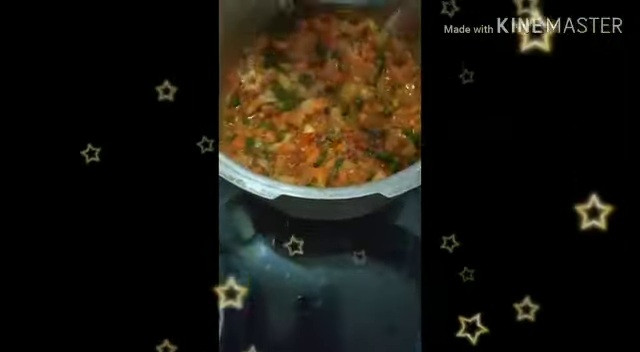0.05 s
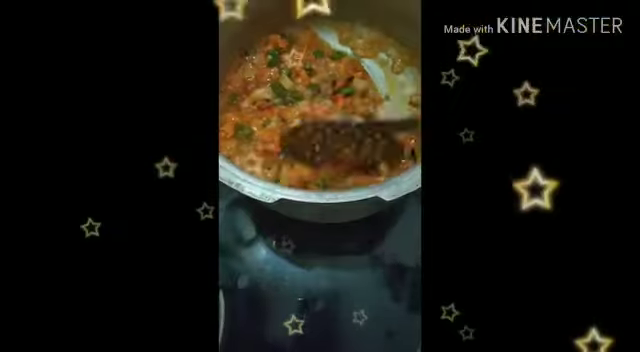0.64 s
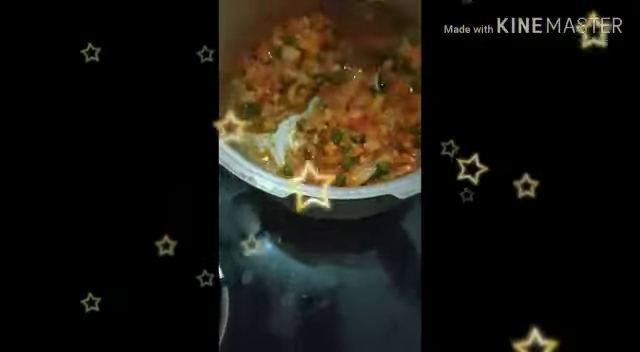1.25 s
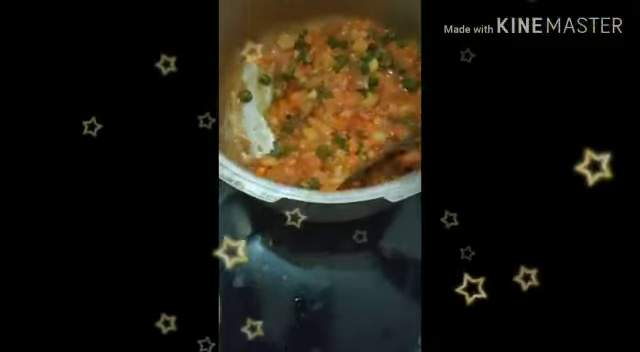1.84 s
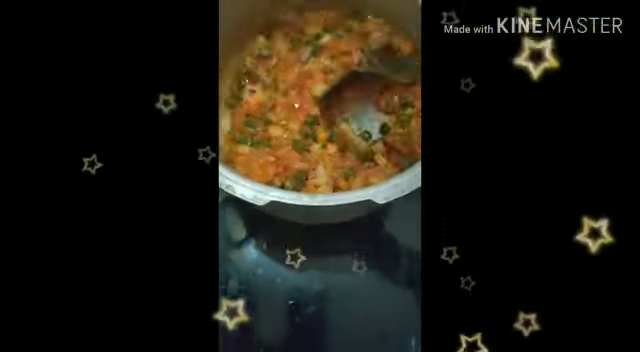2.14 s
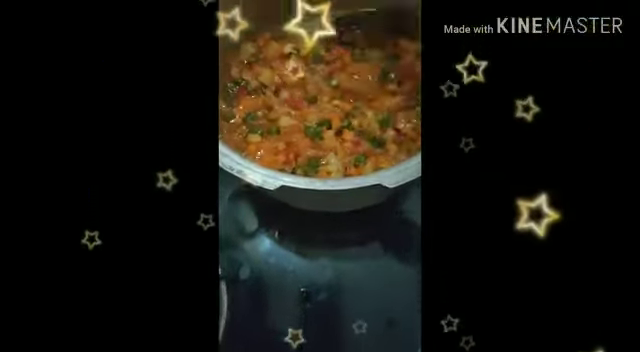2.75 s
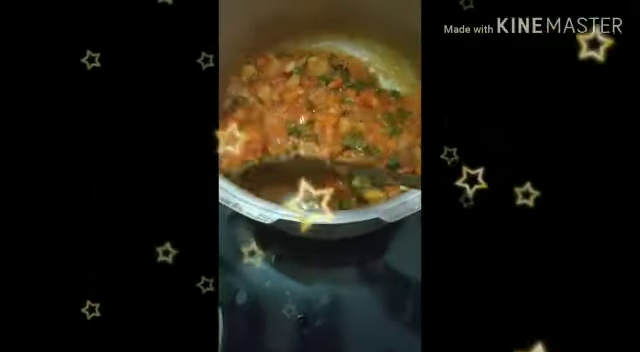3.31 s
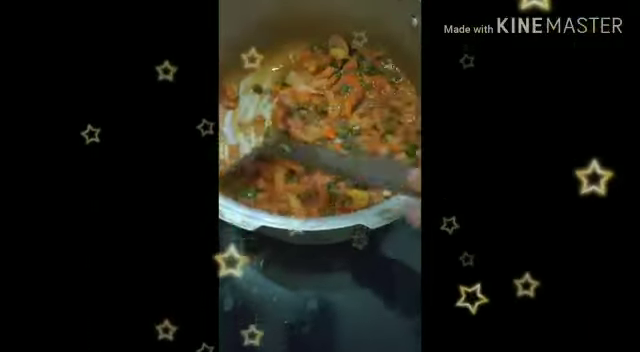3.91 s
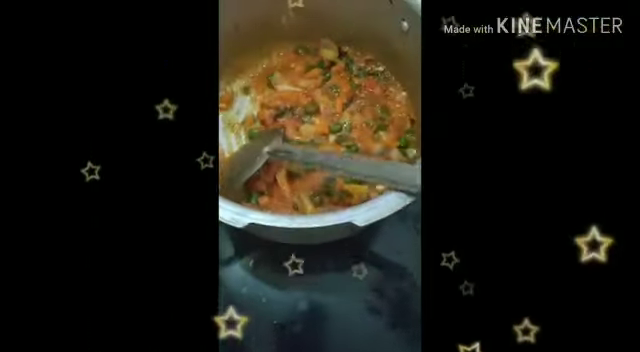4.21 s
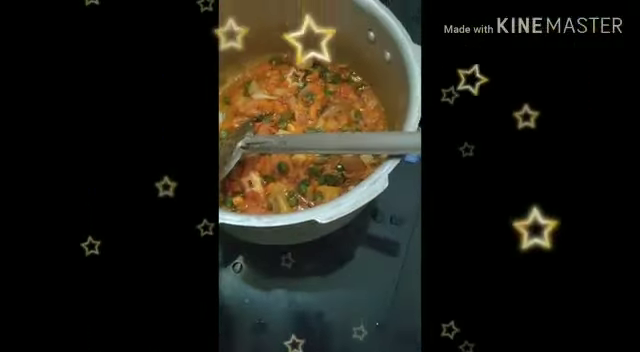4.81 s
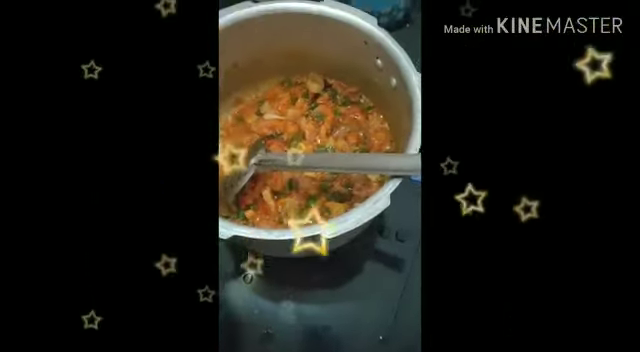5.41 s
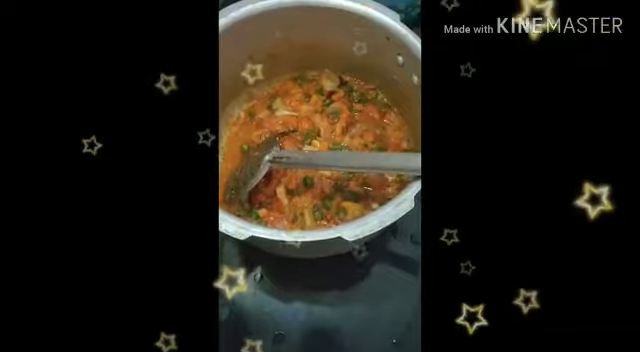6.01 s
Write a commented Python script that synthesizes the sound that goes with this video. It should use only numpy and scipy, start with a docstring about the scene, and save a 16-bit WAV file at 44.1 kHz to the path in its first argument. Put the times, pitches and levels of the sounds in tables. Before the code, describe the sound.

Close up in a small kitchen, a metal ladle churns moist vegetables in an aluminium pot, with uneven scrapes, short damped clanks and soft flops of food over a quiet sizzle. The pot rocks under the shoves, and the loudest knock comes with a low thud. Then the stirring stops, leaving the thick sauce to fry, plop and spit, with little hisses of steam near the end.

```python
"""Thick vegetables sizzle close by in a small kitchen, and a steel ladle starts stirring them at once.
It knocks on the aluminium pressure cooker, sticks and slips over the bottom and churns the wet food.
Shoves rock the pot; one hard blow jolts it on the stove. Then the ladle rests and the frying swells:
bursting bubbles ring the air in the pot, fat spits and steam spurts through the sauce."""
import sys
import numpy as np
from scipy import signal
from scipy.fft import rfft, irfft
from scipy.io import wavfile
from scipy.ndimage import uniform_filter1d

SR = 44100
rng = np.random.default_rng(int(sys.argv[2]) if len(sys.argv) > 2 else 0)


def wav_record(signal):
    """Record a signal, one row per channel, as 16-bit PCM in the file named by sys.argv[1]."""
    frames = np.transpose(np.atleast_2d(signal))
    bounded = np.clip(frames, -1, 1)
    # unit amplitude maps onto the largest positive 16-bit level
    quanta = np.round(bounded * 32767).astype(np.int16)
    wavfile.write(sys.argv[1], SR, quanta)


N = 267241
T = np.arange(N) / SR


def undb(db):
    """Decibels to gain."""
    return 10 ** (np.asarray(db) / 20)


def unit(x):
    """Scale to rms 1."""
    return x / np.sqrt(np.mean(x ** 2))


def colour(x, points):
    """Causal filter through (Hz, dB) points, built from the cepstrum."""
    size = 2048
    hz, db = np.transpose(points)
    bins_hz = np.maximum(np.arange(size // 2 + 1) * SR / size, 1)
    gain = undb(np.interp(np.log(bins_hz), np.log(hz), db))
    cepstrum = irfft(np.log(gain))
    cepstrum[1:size // 2] *= 2
    cepstrum[size // 2 + 1:] = 0
    return signal.fftconvolve(x, irfft(np.exp(rfft(cepstrum))))[:len(x)]


def resonate(x, hz, width_hz):
    """Two equal resonators in series, each width_hz wide; gain 1 at the centre."""
    b, a = signal.iirpeak(hz, hz / width_hz, fs=SR)
    return signal.lfilter(b, a, signal.lfilter(b, a, x))


def walk(rate_hz):
    """Smooth random drift, rms 1."""
    hold = int(SR / rate_hz)
    steps = np.repeat(rng.standard_normal(N // hold + 1), hold)
    return unit(uniform_filter1d(uniform_filter1d(steps, hold), hold)[:N])


def grains(per_s, spread_db):
    """Clicks of random time and size, rms 1."""
    sizes = undb(spread_db * np.clip(rng.standard_normal(N), -2, 2)) * rng.choice([-1, 1], N)
    return unit(sizes * (rng.random(N) < per_s / SR))


def fade(t, t60):
    """Exponential decay, 60 dB down at t60."""
    return np.exp(-np.log(1000) * t / t60)


def swell(peak_s, rise_s, fall_s, rounding=0.067):
    """Rises 20 dB per rise_s to a rounded top of gain 1, then falls 20 dB per fall_s."""
    away = np.maximum((peak_s - T) / rise_s, (T - peak_s) / fall_s)
    return undb(-20 * (np.hypot(away, rounding) - rounding))


def surges(table):
    """Joint gain of symmetric swells, summed in power."""
    return np.sqrt(sum((undb(db) * swell(s, slope_s, slope_s)) ** 2 for s, slope_s, db, *_ in table))


def pot_air(modes, swing_db):
    """Bursting bubbles excite the air in the pot; each mode wavers as the bursts move about."""
    air = 0
    for hz, width_hz, db in modes:
        bubbles = grains(per_s=260, spread_db=4.5) * undb(swing_db * walk(10))
        air = air + undb(db) * resonate(bubbles, hz, 2 * width_hz)
    return unit(air)


# Frying contour. Each row: time in seconds, level in dB.
FRYING_LEVEL = [(0, -53.5), (.7, -53), (1.95, -60.5), (2.55, -52.5), (3.55, -53.5), (4.6, -61.5), (5, -57),
                (5.27, -53), (5.47, -56), (6.05, -52)]
# Air modes of the pot, low and high. Each row: frequency in Hz, width in Hz, level in dB.
LOW_AIR_MODES = [(140, 70, -5), (635, 65, 4.5), (1280, 75, 2)]
HIGH_AIR_MODES = [(2190, 237, -7), (2643, 170, -4), (3250, 460, -9), (13020, 1300, -21)]


def frying(bubbling_db=-8.5, sizzle_db=-2.5):
    """Thick sauce bubbles and sizzles on hot metal. Returns the sound and its gain contour."""
    contour = undb(np.interp(T, *np.transpose(FRYING_LEVEL)))
    bubbling = pot_air(LOW_AIR_MODES, swing_db=3.6)
    sizzle = pot_air(HIGH_AIR_MODES, swing_db=2.8) * undb(1.5 * walk(25))
    return contour * (undb(bubbling_db) * bubbling + undb(sizzle_db) * sizzle), contour


# Spectrum of spitting fat. Each row: frequency in Hz, level in dB.
SPIT_SPECTRUM = [(1000, -18), (2200, 1), (4200, 0), (5200, 0), (6600, 1), (8500, -7), (10500, -9),
                 (13000, -12), (15500, -12)]
# Flares. Each row: peak in seconds, rise and fall in seconds, level in dB, steam pitch in Hz.
FLARE_UPS = [(1.27, .15, -61, 8600), (2.5, .2, -57, 6800), (4.78, .1, -65, 5000), (5.27, .2, -61, 4700),
             (5.54, .12, -54, 6400), (5.68, .1, -50, 2300), (5.705, .11, -45.5, 6900),
             (5.97, .2, -53.5, 5900)]


def fat_and_steam(frying_gain, steady_db=-21, flare_db=-4):
    """Fat spits throughout; at each flare it spits harder and steam jets through a hole in the sauce."""
    fat = colour(grains(per_s=550, spread_db=7.5), SPIT_SPECTRUM) * undb(2.8 * walk(30))
    fat_gain = np.hypot(undb(flare_db) * surges(FLARE_UPS), undb(steady_db) * frying_gain)
    fizz = grains(per_s=800, spread_db=6)
    steam = sum(undb(db) * swell(s, slope_s, slope_s) * unit(resonate(fizz, hz, width_hz=1100))
                for s, slope_s, db, hz in FLARE_UPS)
    return fat_gain * unit(fat) + steam


def hush(level_db=-81):
    """Faint, steady low noise."""
    noise = colour(rng.standard_normal(N), [(25, -8), (150, -7), (400, -18.5), (900, -48.5)])
    return undb(level_db) * unit(noise)


# Modes of the food-damped pot and ladle. Each row: frequency in Hz, t60 in seconds, level in dB.
METAL_MODES = [(338, .14, -22), (640, .12, -14), (1182, .08, -14), (1243, .09, -10.5), (1845, .1, -9),
               (2331, .08, -9), (5254, .1, -15), (6260, .2, -7), (6497, .2, -7), (6761, .2, -8),
               (7063, .2, -7), (7520, .2, -9)]


def ring(t, scatter_db, detune):
    """The metal rings; each contact point weights and shifts its modes differently."""
    hz, t60_s, db = np.transpose(METAL_MODES)[:, :, None]
    size, shift, phase = rng.standard_normal((3, len(METAL_MODES), 1))
    waves = np.sin(2 * np.pi * hz * (1 + detune * shift) * t + np.pi * phase)
    return np.sum(undb(db + scatter_db * size) * fade(t, t60_s) * waves, axis=0)


def attack_db(blow, band_hz):
    """Level of one band in the first 12 ms of a blow."""
    bandpass = signal.butter(3, band_hz, 'band', fs=SR, output='sos')
    return 10 * np.log10(np.mean(signal.sosfilt(bandpass, blow[:int(.012 * SR)]) ** 2))


# Dense overtones of the metal. Each row: frequency in Hz, level in dB.
METAL_SPECTRUM = [(60, -19.5), (170, 2), (430, -12), (640, -1), (900, -12.5), (1250, -0.5), (1600, 5.5),
                  (1900, 12.5), (2400, 20.5), (3400, 16.5), (4150, 4), (4900, 10), (6800, 8.5),
                  (8300, -3.5), (9600, -17.5), (15000, -23.5)]
# Ladle blows. Each row: start in seconds, note of the struck spot in Hz, strength in dB, bottom ring
# in dB, contact hardness in dB, thud through the food in dB, blade chatter t60 in seconds.
BLOWS = [(0.111, 2410, -45, -30, -33, -16, 0.038), (0.79, 1275, -39.5, 9.5, 10, 1, 0.03),
         (0.9717, 1248, -31, 9.5, -10, 9, 0.013), (0.985, 1950, -48.5, 15, 15.5, 3, 0.08),
         (1.013, 1253, -43, 19, -25, 12, 0.028), (1.039, 1165, -42.5, 15.5, -50, 1, 0.028),
         (1.485, 1270, -42, 12.5, 0.5, -4, 0.019), (1.6197, 6300, -44.5, 7.5, 0.5, -4, 0.039),
         (1.638, 2410, -38, 13, 0, 7.5, 0.019), (2.183, 2860, -43.5, -1, -34, 1, 0.004),
         (2.5947, 2465, -34, -12.5, 2.5, -4, 0.028), (3.186, 2342, -23, 0, 2.5, -7.5, 0.018),
         (3.1894, 1793, -27.5, 10.5, 17, 4.5, 0.02), (3.2939, 1680, -35, 17, 1, 3, 0.015),
         (3.306, 806, -46.5, 26, -10, 24, 0.013), (3.335, 686, -49, 21.5, 8, 21.5, 0.033),
         (3.6122, 2430, -32.5, 0, -15, -5, 0.022), (3.7451, 2480, -39.5, 18, 5, 2, 0.029),
         (3.874, 920, -45.5, 11, -5, -2, 0.013), (3.8803, 5370, -37, 9, 7, 10.5, 0.012),
         (4.132, 1934, -35, 6, 10.5, -0.5, 0.029), (4.177, 1330, -39.5, 12, 8.5, 0.5, 0.012)]


def knocks(level_db=1, clash_db=15, note_db=6, bass_db=-7, contact_s=0.00092, rise_s=0.0009):
    """The ladle strikes the pot: a chattering clash, a ring and a thud. Harder contact is brighter."""
    out, t = np.zeros(N + SR), np.arange(SR // 3) / SR
    for start_s, note_hz, strength_db, bottom_db, hard_db, thud_db, chatter_t60_s in BLOWS:
        chatter = fade(np.maximum(t - contact_s, 0), chatter_t60_s)
        clash = undb(clash_db) * colour(rng.standard_normal(len(t)) * chatter, METAL_SPECTRUM)
        note_gain = undb(note_db + np.interp(note_hz, *np.transpose(METAL_SPECTRUM)))
        note = note_gain * np.sin(2 * np.pi * note_hz * t) * fade(t, 1.62 * chatter_t60_s)
        blow = (clash + note + ring(t, scatter_db=2.8, detune=.009)) * (1 - np.exp(-t / rise_s))
        # Each row: low edge in Hz, high edge in Hz, attack level in dB re strength.
        bands = [(200, 520, thud_db - 18.5), (650, 1500, bottom_db), (1800, 3400, 0),
                 (5000, 8500, 0.6 * hard_db - 1.5),  # blade ring
                 (10000, 15000, hard_db - 13)]  # edge tick
        tone = [(np.sqrt(lo * hi), strength_db + db - attack_db(blow, (lo, hi))) for lo, hi, db in bands]
        bass = (160, tone[0][1] + bass_db)  # follows the thud
        start = int(start_s * SR)
        out[start:start + len(t)] += colour(blow, [bass] + tone)
    return out[:N] * undb(level_db)


# Ladle strokes. Each row: hardest push in seconds, rise in seconds, fall in seconds, rub in dB,
# squelch in dB, rasp in dB, squelch pitch in Hz.
LADLE_STROKES = [(0.143, 0.024, 0.049, -69, -67.5, -34.5, 890), (0.378, 0.25, 0.06, -40, -35, -45.5, 1300),
                 (.47, 0.6, 0.56, -45, -36.5, -61, 596), (1.02, 0.041, 0.14, -41, -38.5, -45, 548),
                 (1.54, 0.1, 0.083, -49, -38, -53.5, 964), (1.67, 0.045, 0.066, -41, -44.5, -40.5, 750),
                 (2.128, 0.077, 0.031, -40, -38.5, -48.5, 1080),
                 (2.31, 0.067, 0.059, -49.5, -53.5, -54.5, 976), (2.69, 0.14, 0.19, -43, -47.5, -43, 474),
                 (2.843, 0.24, 0.25, -32.5, -35, -39, 1070), (3.22, 0.04, 0.16, -34.5, -49, -39.5, 700),
                 (3.32, 0.093, .16, -46.5, -46, -46.5, 700), (3.79, 0.22, 0.23, -45, -40, -74, 580),
                 (3.9, 0.24, 0.14, -43.5, -40, -41, 407), (4.21, 0.031, 0.6, -54, -54.5, -63.5, 397)]


def strokes(squelch_exponent=2.08, sink_oct_per_s=6.5, sink_s=0.2):
    """Each push drives the rub, squelch and rasp gains; the squelch pitch sinks as food piles up."""
    power, weighted_hz = np.zeros((3, N)), np.zeros(N)
    for peak_s, rise_s, fall_s, rub_db, squelch_db, rasp_db, squelch_hz in LADLE_STROKES:
        push = swell(peak_s, rise_s, fall_s) + np.finfo(float).eps
        squelch = undb(squelch_db) * push ** squelch_exponent
        power += np.square([undb(rub_db) * push, squelch, undb(rasp_db) * push])
        sink_oct = sink_oct_per_s * np.clip(T - peak_s, -sink_s, sink_s)
        weighted_hz += squelch ** 2 * squelch_hz * 2 ** -sink_oct
    return *np.sqrt(power), weighted_hz / power[1]


def dragged_ring(friction, damping_t60_s=0.1):
    """Each 50 ms of the blade's path rings the metal differently, damped by the blade's pressure."""
    out, t, step = np.zeros(N + SR), np.arange(SR // 10) / SR, SR // 20
    for start in range(0, N, step):
        body = ring(t, scatter_db=4, detune=.025) * fade(t, damping_t60_s)
        sound = signal.fftconvolve(friction[start:start + step], body / np.sqrt(np.sum(body ** 2)))
        out[start:start + len(sound)] += sound
    return out[:N]


# Spectrum of wet food. Each row: frequency in Hz, level in dB.
SQUELCH_SPECTRUM = [(60, -15), (170, 0), (320, -1), (430, -5), (630, 1.5), (900, -1), (1250, 2), (2200, -1),
                    (4000, -13)]


def wet_pops(centre_hz, per_s=750, spread_oct=1.15, spread_db=3, cycles=12):
    """Pockets of steam and air burst in the food: a few cycles each, rising slightly in pitch."""
    out = np.zeros(N + SR)
    for when, pitch, size in rng.random((int(per_s * N / SR), 3)):
        start = int(when * N)
        hz = centre_hz[start] * 2 ** (spread_oct * (2 * pitch - 1))
        age = np.linspace(0, 1, min(int(cycles * SR / hz), SR))
        wave = np.sin(2 * np.pi * hz * len(age) / SR * age * (1 + 0.04 * age)) * fade(age, 1)
        out[start:start + len(age)] += undb(-spread_db * np.log(0.23 + size)) * wave
    pops = out[:N] * np.sqrt(centre_hz)  # higher pops are shorter but as strong
    return unit(colour(pops, SQUELCH_SPECTRUM))


# Blade on the food-covered bottom (rub) and on bare metal (rasp). Each row: frequency in Hz, level in dB.
RUB_SPECTRUM = [(400, -32), (750, 2), (1000, -5.5), (1250, 5), (1550, -0.5), (2200, 0), (3300, 0.5),
                (4200, -17), (9000, -58.5)]
RASP_SPECTRUM = [(2000, -38), (3300, -27.5), (4150, 5.5), (5200, 3.5), (7000, 5), (8200, 1.5), (10000, -9),
                 (15000, -11)]
# Short scraping ticks: the blade catches on the bottom or lightly knocks the pot.
# Each row: start in seconds, level in dB.
SCRAPE_TICKS = [(.259, -34), (.351, -43), (1.445, -47.5), (2.059, -52), (2.103, -34), (2.749, -42),
                (2.875, -35), (3.769, -56), (3.82, -34.5)]


def scrape(rub_db=-3, rasp_db=-4, squelch_db=-7.5, ring_db=-5, tick_t60_s=0.092, tick_rasp_db=-9):
    """The blade sticks, slips and ticks against the pot, ringing the metal and squelching the food."""
    rub_gain, squelch_gain, rasp_gain, squelch_hz = strokes()
    ticks = sum(undb(db) * (T > s) * fade(np.abs(T - s), tick_t60_s) for s, db in SCRAPE_TICKS)
    slips = grains(per_s=1100, spread_db=5) * undb(2.2 * walk(70))
    grit = slips + grains(per_s=2200, spread_db=7) * undb(2.5 * walk(45))
    dull, bright = (x + undb(ring_db) * dragged_ring(x) for x in (slips, grit))
    rub = np.hypot(rub_gain, ticks) * unit(colour(dull, RUB_SPECTRUM))
    rasp = np.hypot(rasp_gain, undb(tick_rasp_db) * ticks) * unit(colour(bright, RASP_SPECTRUM))
    squelch = squelch_gain * wet_pops(squelch_hz)
    return undb(rub_db) * rub + undb(rasp_db) * rasp + undb(squelch_db) * squelch


# Food tumbles off the blade. Each row: peak in seconds, rise and fall in seconds, level in dB.
FOOD_TUMBLES = [(.14, 0.19, -45.5), (.69, 0.26, -43), (1.06, 0.31, -46), (1.66, 0.11, -47),
                (2.03, 0.11, -48.5), (2.22, 0.07, -47), (2.94, 0.36, -49), (3.91, 0.12, -43.5),
                (4.05, 0.052, -44)]


def churn(level_db=-7, flop_db=-12):
    """Lumps of food flop over and boom softly in the pot."""
    lumps = grains(per_s=200, spread_db=6)
    boom = lumps
    for hz, width_hz in [(172, 32), (205, 136)]:
        boom = signal.lfilter(*signal.iirpeak(hz, hz / width_hz, fs=SR), boom)
    flop = resonate(lumps, hz=290, width_hz=860)
    return undb(level_db) * surges(FOOD_TUMBLES) * (unit(boom) + undb(flop_db) * unit(flop))


# The ladle shoves the pot. Each row: peak in seconds, rise in seconds, level in dB.
POT_SHOVES = [(.19, .12, -38.5), (.65, .13, -56), (3.26, .05, -41), (3.95, .08, -52.5)]


def pot_on_stove(rock_hz=101, rock_db=-4, rock_fall_s=0.27, jolt_s=3.187, jolt_db=-26, jolt_t60_s=0.1):
    """The heavy pot rocks on its support; the hardest blow sends a thud through it."""
    wobble_hz = rock_hz * (1 + 0.045 * walk(30))
    rocking = unit(np.sin(2 * np.pi * np.cumsum(wobble_hz) / SR) * undb(1.6 * walk(22)))
    shoves = sum(undb(db) * swell(s, rise_s, rock_fall_s) for s, rise_s, db in POT_SHOVES)
    thud_spectrum = [(25, -6), (55, -3.5), (90, 2.5), (150, -31), (280, -8), (2000, -51)]
    thud = unit(colour(rng.standard_normal(N), thud_spectrum))
    jolt = (T > jolt_s) * fade(np.abs(T - jolt_s), jolt_t60_s)
    return undb(rock_db) * shoves * rocking + undb(jolt_db) * jolt * thud


# Large bubbles in the sauce. Each row: start in seconds, pitch in Hz, level in dB.
LARGE_BUBBLES = [(4.789, 178, -53.5), (4.834, 181, -57), (4.958, 146.6, -47), (5.285, 169, -52),
                 (5.72, 165, -51)]


def plops(open_s=0.002, t60_s=0.1, air_db=-9):
    """A large bubble opens with a low note and briefly rings the air in the pot."""
    out, air_hz = np.zeros(N), LOW_AIR_MODES[1][0]
    for start_s, hz, db in LARGE_BUBBLES:
        age_s = np.maximum(T - start_s, 0)
        envelope = undb(db) * (1 - np.exp(-age_s / open_s)) * fade(age_s, t60_s)
        air = undb(air_db) * np.sin(2 * np.pi * air_hz * age_s)
        out += envelope * (np.sin(2 * np.pi * hz * age_s) + air)
    return out


def kitchen(x, tail_db=-1.5, t60_s=0.36, treble_t60_s=0.27, build_s=0.00067, bass_hz=330, lag_samples=5):
    """Direct sound reaches the right microphone first; hard walls add a short tail, mono in the bass."""
    t = np.arange(SR // 2) / SR
    noise = rng.standard_normal((3, len(t)))
    bass = signal.sosfilt(signal.butter(2, bass_hz, fs=SR, output='sos'), noise[2])
    wide = signal.sosfilt(signal.butter(2, bass_hz, 'high', fs=SR, output='sos'), noise[:2])
    mids = signal.sosfilt(signal.butter(1, 5000, fs=SR, output='sos'), wide)
    tail = (bass + mids) * fade(t, t60_s) + (wide - mids) * fade(t, treble_t60_s)
    tail *= 1 - np.exp(-t / build_s)
    tail *= undb(tail_db) / np.sqrt(np.sum(tail ** 2) / 2)
    direct = np.array([np.pad(x, (lag_samples, 0))[:N], x])
    return direct + signal.fftconvolve(x[None], tail, axes=1)[:, :N]


def pan(pair, balance):
    """Frequency-dependent balance, split equally between the channels."""
    return np.array([colour(x, [(hz, side * db / 2) for hz, db in balance])
                     for x, side in zip(pair, (1, -1))])


# The frying sits to the left. Each row: frequency in Hz, left minus right in dB.
FRYING_BALANCE = [(200, -4), (650, 0), (1290, 7.5), (2400, 8), (4400, 5), (13000, 3)]


def scene():
    """Frying, ladle and pot in the kitchen, over a low hush."""
    simmer, frying_gain = frying()
    spitting = fat_and_steam(frying_gain)
    mix = kitchen(knocks()) + kitchen(scrape() + churn() + spitting) + pot_on_stove() + hush()
    return mix + pan(kitchen(simmer + plops()), FRYING_BALANCE)


# Colour of the two microphone ports. Each row: frequency in Hz, left minus right in dB.
PORT_BALANCE = [(100, 2.4), (500, -.5), (1200, 2.5), (2400, 5.5), (3600, 2), (4800, -3), (6400, -4.5),
                (8500, -3), (10500, 1), (13000, 5)]


def record(dry):
    """Each port colours the sound; peaks are rounded and the top is cut at 15.5 kHz."""
    lowpass = signal.ellip(8, .2, 70, 15500, fs=SR, output="sos")
    return signal.sosfilt(lowpass, np.tanh(pan(dry, PORT_BALANCE)))


dry = scene()
out = record(dry)
wav_record(out)
```